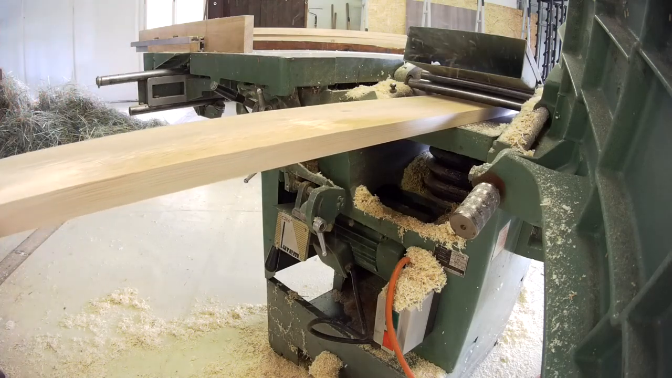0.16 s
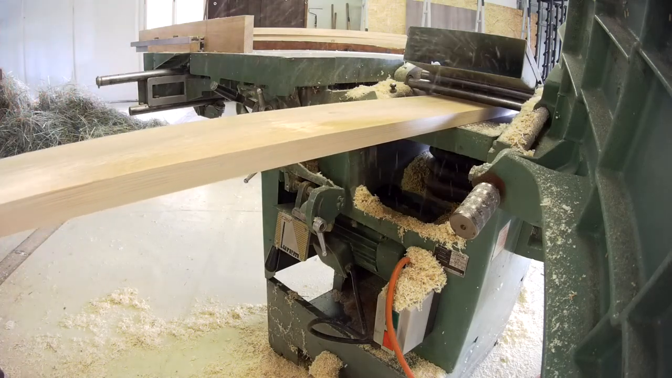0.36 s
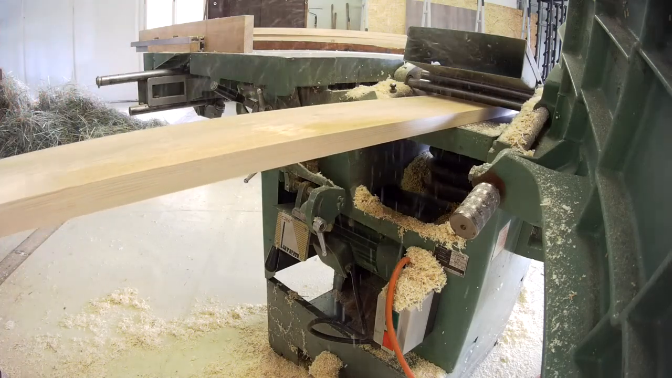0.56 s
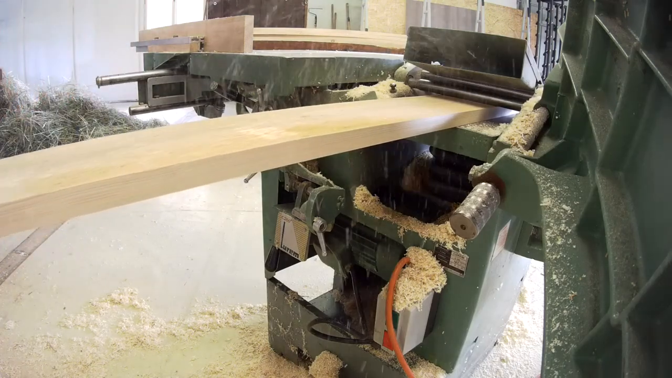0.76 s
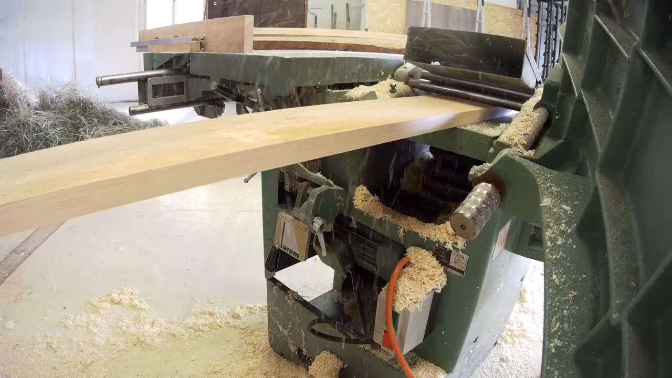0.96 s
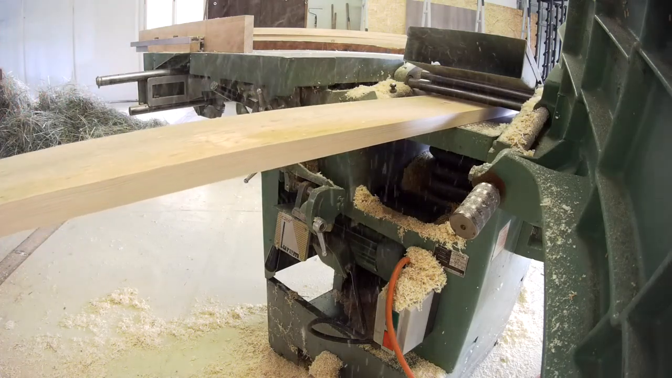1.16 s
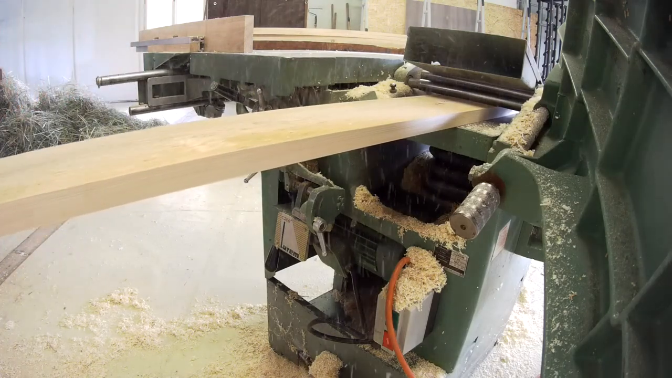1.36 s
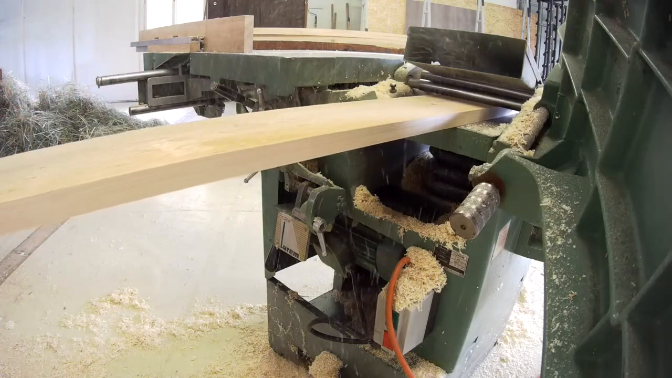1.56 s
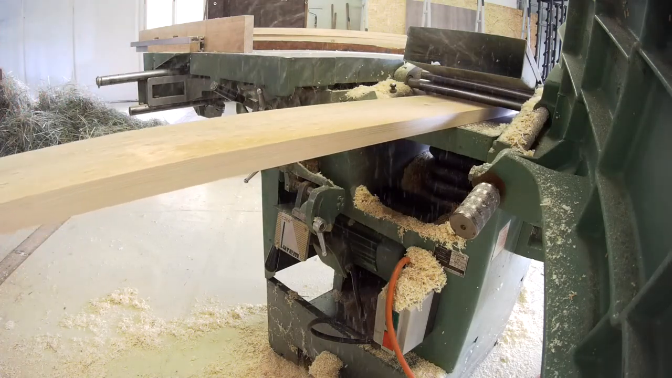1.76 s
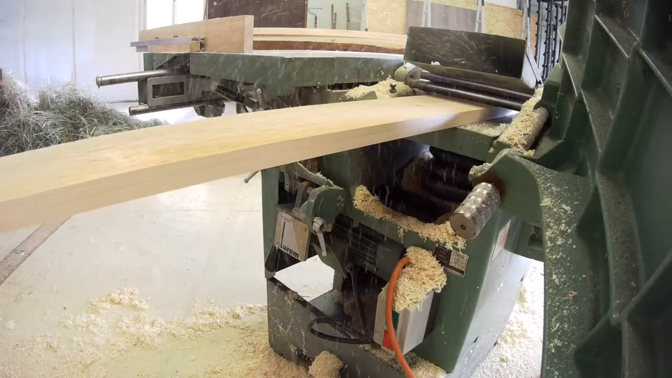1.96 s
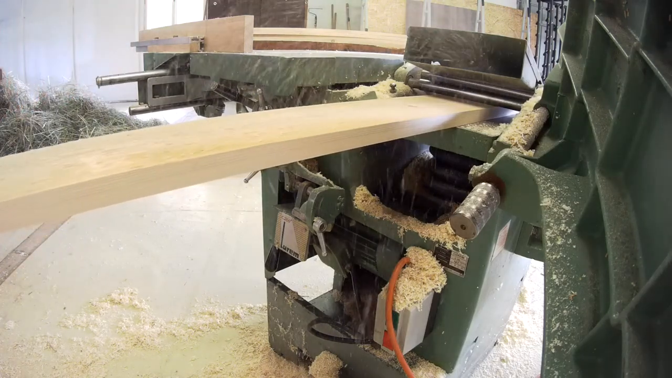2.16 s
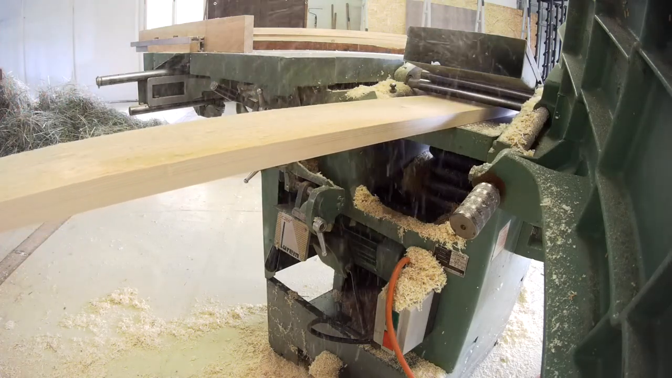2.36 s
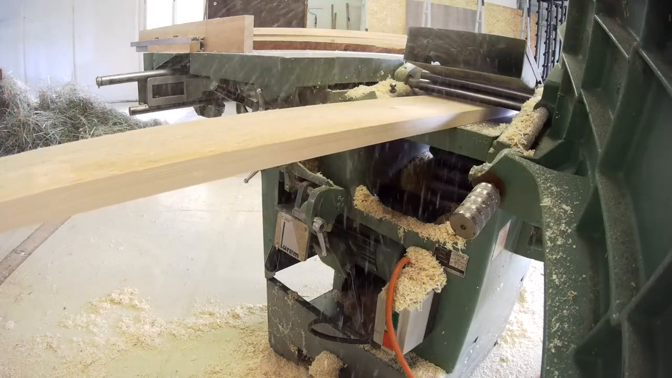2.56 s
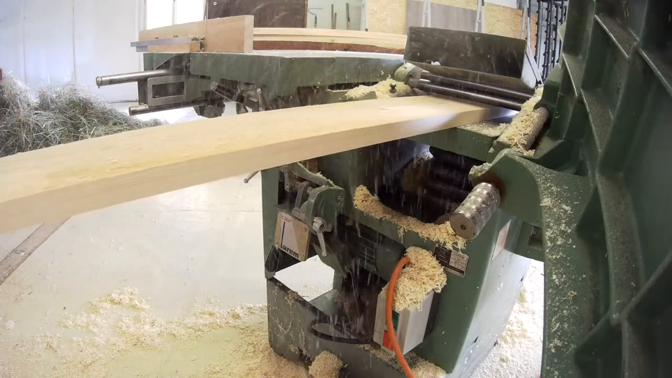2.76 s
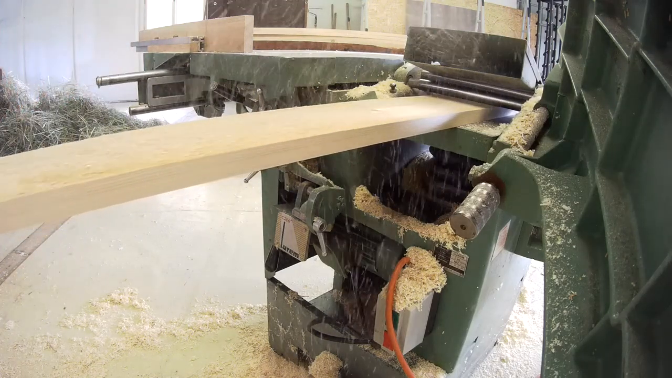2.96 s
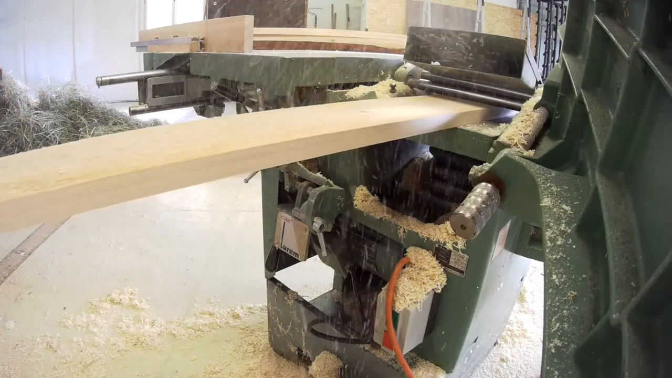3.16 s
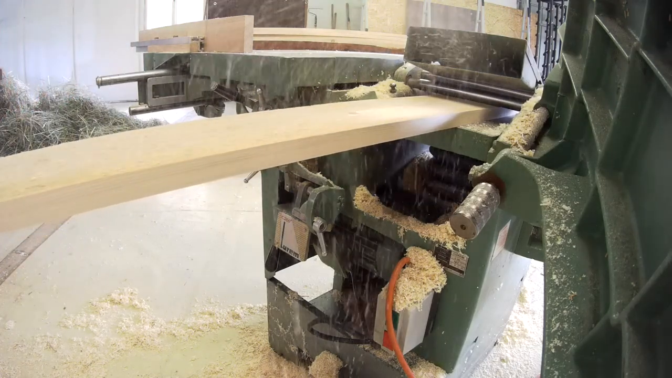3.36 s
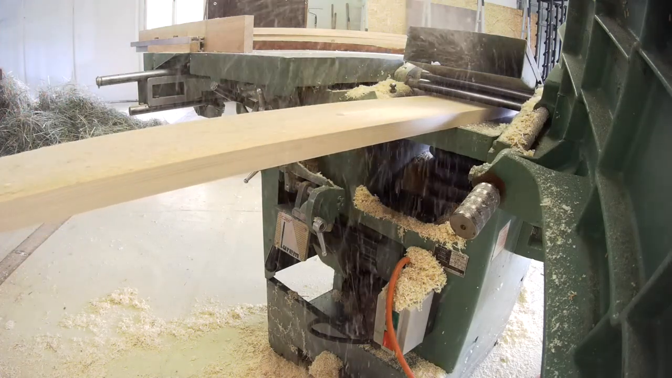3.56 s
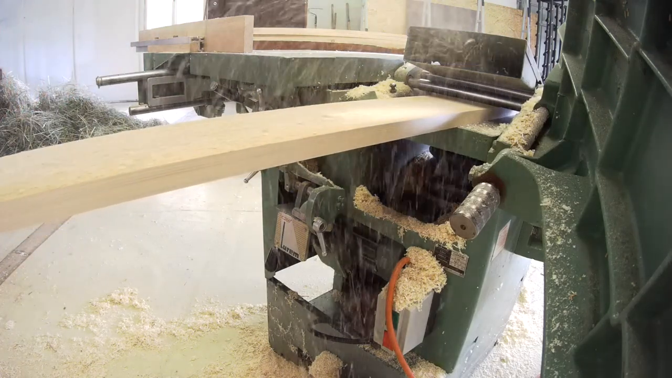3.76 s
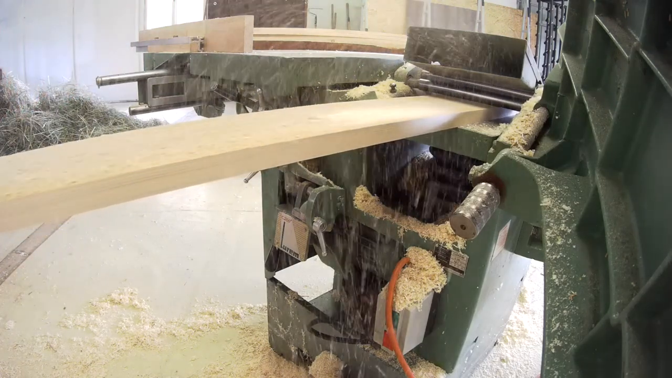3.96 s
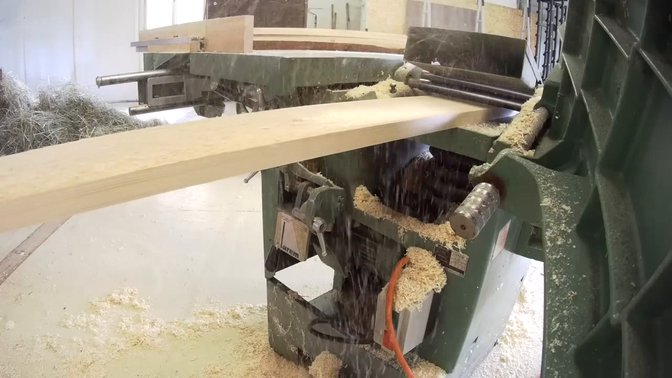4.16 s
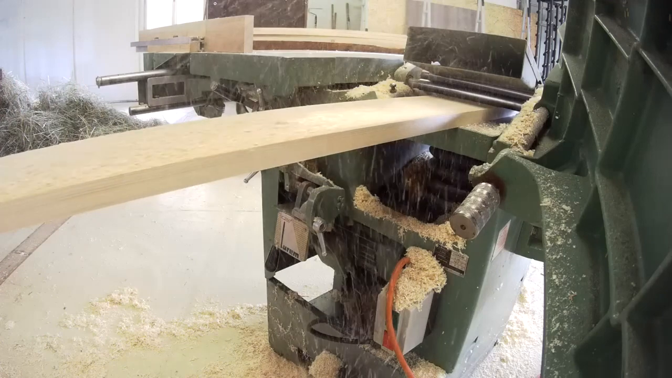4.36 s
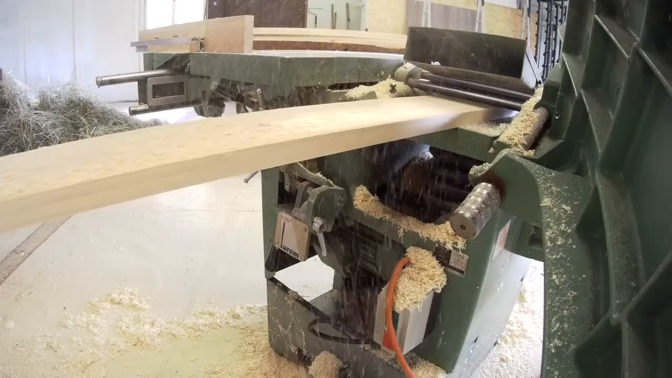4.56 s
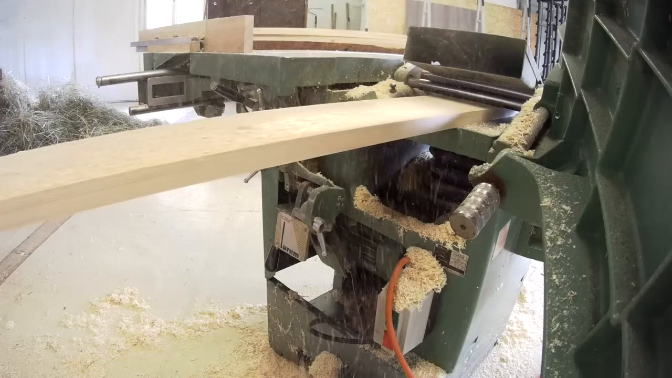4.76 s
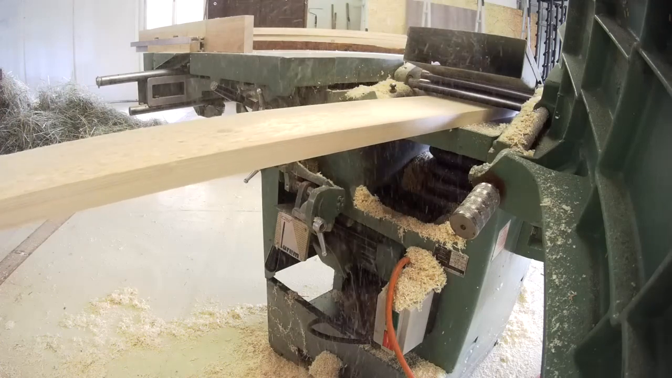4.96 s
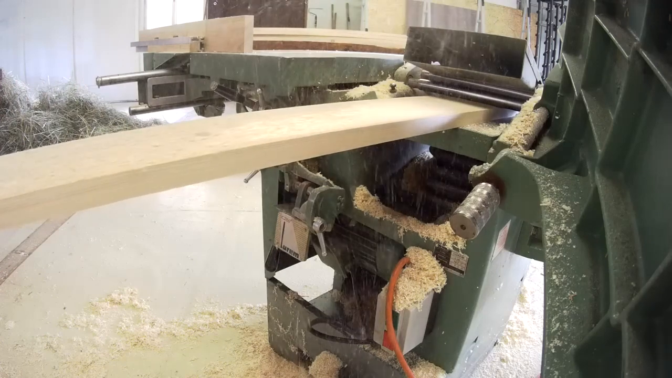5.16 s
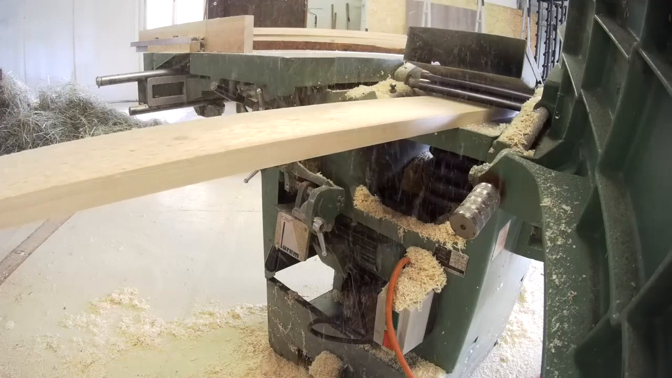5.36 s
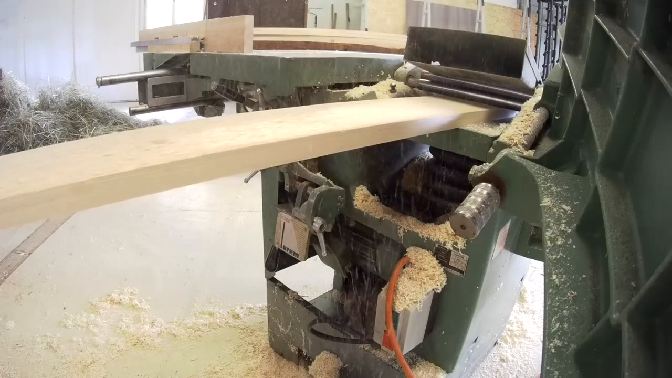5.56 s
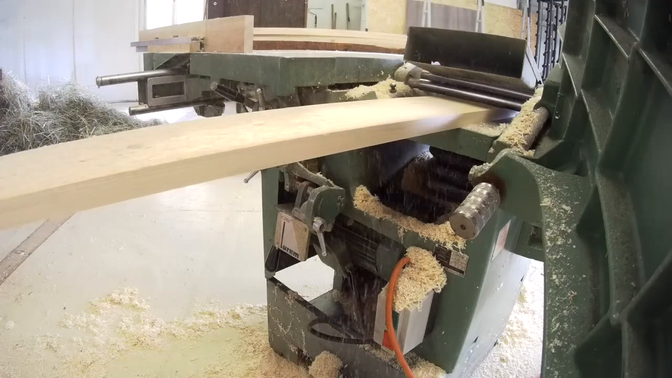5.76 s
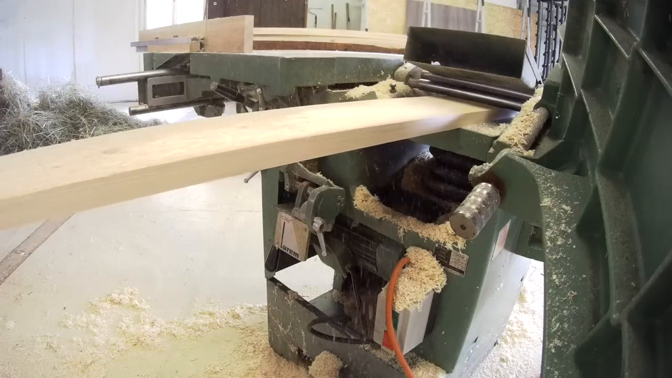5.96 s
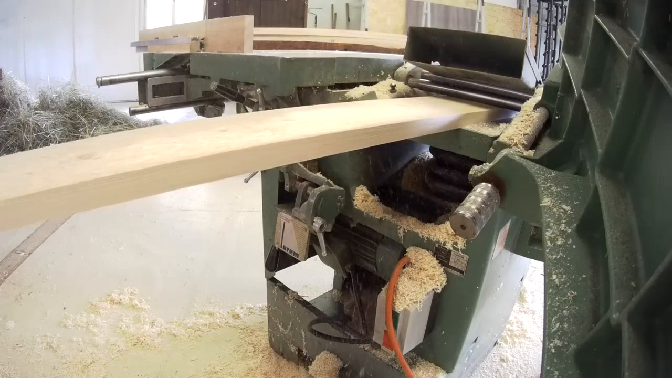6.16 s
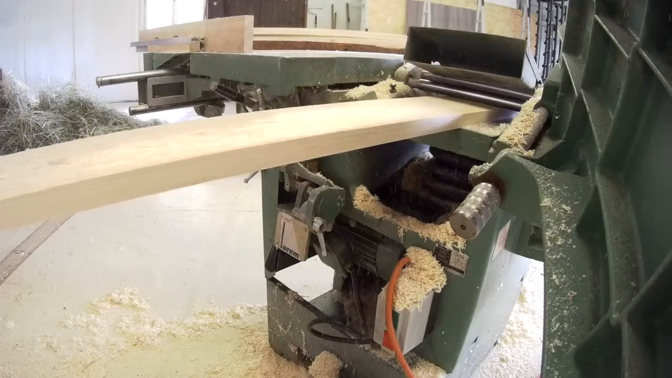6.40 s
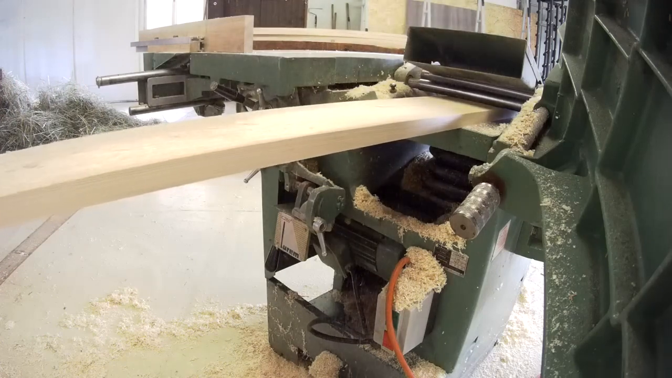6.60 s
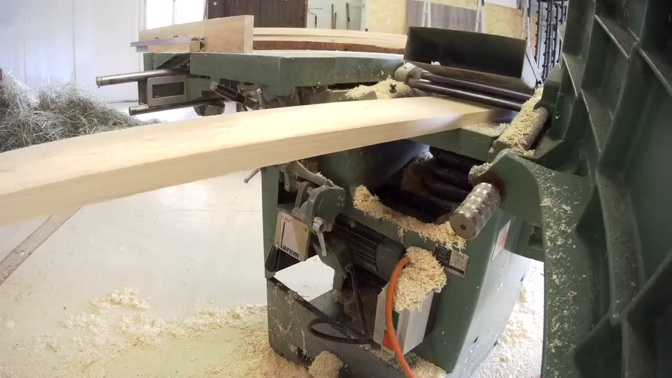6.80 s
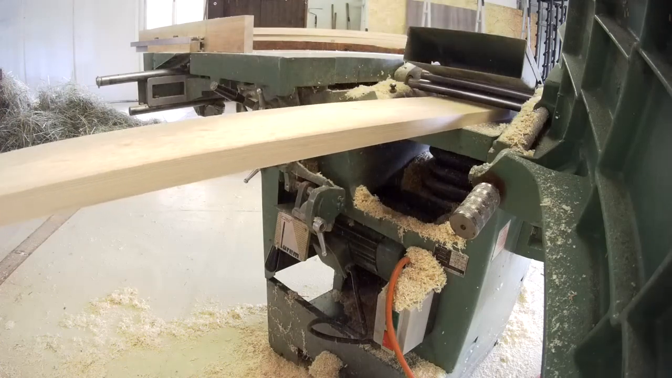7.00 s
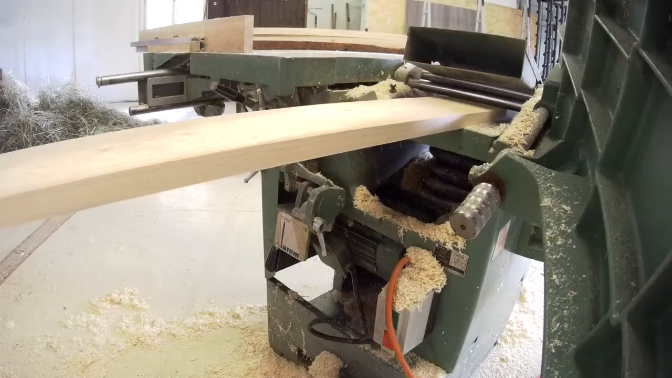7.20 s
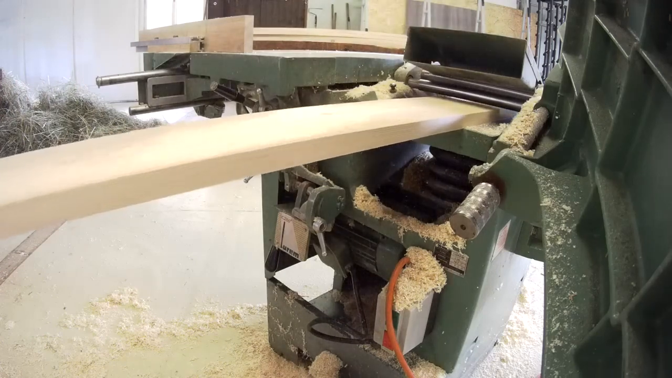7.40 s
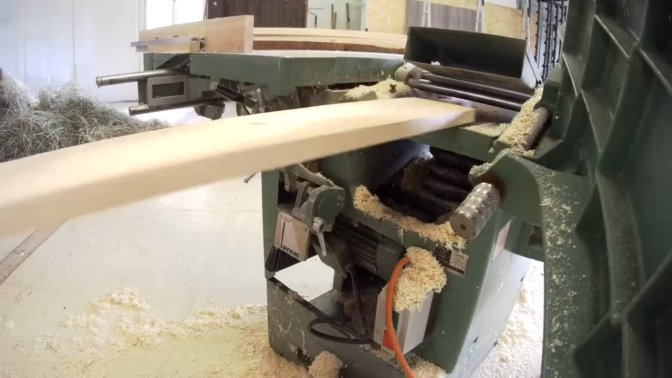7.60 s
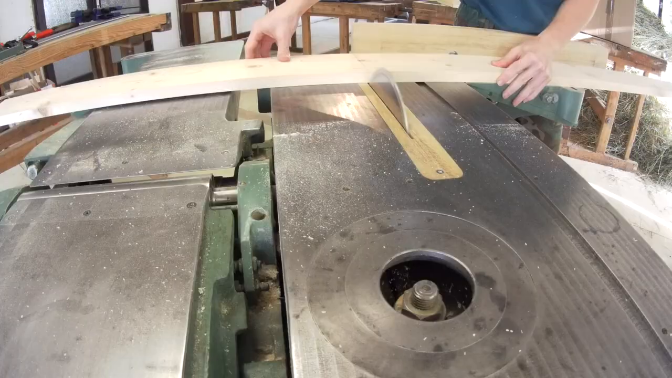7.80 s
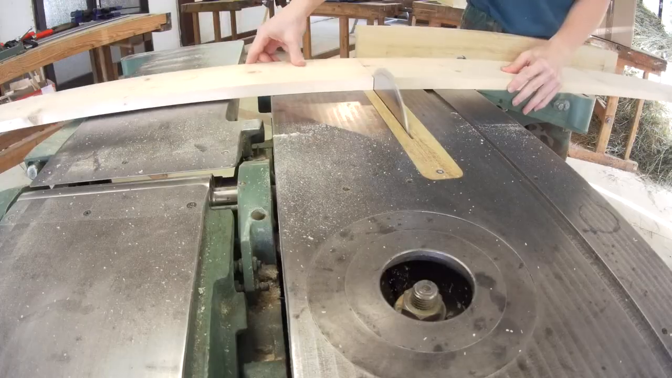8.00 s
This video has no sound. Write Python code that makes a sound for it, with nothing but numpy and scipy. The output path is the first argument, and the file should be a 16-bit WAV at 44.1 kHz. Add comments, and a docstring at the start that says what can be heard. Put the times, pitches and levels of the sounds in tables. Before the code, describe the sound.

Loud planer whine and machine rumble, with the rough rasp of wood being cut and chips spraying until the cut runs out.

```python
"""A loud whine and a woody rasp: a belt-driven thickness planer is already cutting a board.
Its three knives chop the air like a siren and strike the wood into resonance, labouring at a knot,
while chips patter on the hood until the cut runs out near 5.5 s. Beneath them the machine rumbles and
hums, a bearing sings and the belt throbs and chirps on every lap. The close microphone overloads,
and all stops dead at 7.83 s."""
import sys
import numpy as np
from scipy import signal
from scipy.fft import irfft
from scipy.io import wavfile

SR = 44100
rng = np.random.default_rng(int(sys.argv[2]) if len(sys.argv) > 2 else 0)


def bounce(signal):
    """Save signal as a 16-bit WAV file at the path given by the first command-line argument."""
    frames = np.transpose(np.atleast_2d(signal))
    limited = np.clip(frames, -1, 1)
    pcm = np.round(limited * 32767).astype(np.int16)
    wavfile.write(sys.argv[1], SR, pcm)


N = 354560
TIME = np.arange(N) / SR

# Likeness of left and right: f/Hz, correlation
COHERENCE = [(3500, 0.99), (5000, 0.12), (6500, 0.78), (8500, 0.36), (14000, .1)]
# Rotation of the cutter block, sagging under load: t/s, rate/Hz
BLOCK_SPEED = [(0.1, 115.19), (0.8, 115.12), (1.45, 115.27), (2, 114.95), (2.9, 114.93), (3.4, 114.76),
               (3.62, 114.45), (3.9, 115.02), (4.6, 115.28), (5.2, 115.22), (5.6, 115.58), (6.5, 115.69)]
# Windage and belt noise: f/Hz, relative spectral density/dB
RUMBLE_SPECTRUM = [(40, -4.5), (70, -40.5), (110, 2), (170, -1), (260, -1.5), (450, 2.5), (700, 3.5),
                   (1000, 4), (1400, 1.5), (2300, -8), (2700, -9.5), (6500, -9), (9500, -20),
                   (12300, -30.5), (14000, -70)]
# Drone of the unbalanced block: harmonic of the turn rate, free level/dB, loaded level/dB
UNBALANCE_TONES = [(2, -54, -54), (4, -46.5, -51), (5, -49, -47), (7, -45.5, -42), (8, -45, -48),
                   (10, -70.5, -47), (11, -79.5, -51.5), (13, -55.5, -49.5), (14, -57, -50),
                   (16, -72, -53.5), (17, -56, -46.5)]
# Motor and fan: f/Hz at idle, level/dB
MOTOR_TONES = [(48.7, -59.5), (487, -55.5), (1342, -50.5), (1980, -50.5)]
# The frame's once-a-turn hum: t/s, relative level/dB
FRAME_HUM = [(0.0, -54.5), (1.65, -53), (2.32, -51.5), (2.41, -67), (3.06, -61), (4.02, -60.5),
             (4.11, -48.5), (5.15, -69), (6.08, -48), (7.8, -51.5)]
# Resonances of the casting: f/Hz, bandwidth/Hz, level/dB
CASTING_MODES = [(976, 108, -41), (1033.7, 44, -39), (2156, 320, -46), (3015, 70, -53.5), (4150, 510, -49),
                 (5230, 390, -50), (6380, 550, -54), (7820, 370, -56)]
# Worn spots on the belt: position/laps, half length/laps, f/Hz, level/dB
WORN_SPOTS = [(0.03, 0.12, 2040, -43.5), (0.13, 0.058, 3030, -49), (0.84, 0.05, 2080, -48.5),
              (1, 0.23, 2900, -51.5), (1, 0.074, 4400, -53), (0.95, 0.16, 4000, -51.5),
              (0.4, 0.035, 3500, -55), (0.1, 0.084, 6000, -62), (0.9, 0.079, 4100, -64),
              (.14, .1, 18000, -61), (0.4, 0.14, 8300, -62), (0.62, 0.24, 9060, -52.5)]
# The board knocks on the table just before the knot: t/s, level/dB
TABLE_KNOCKS = [(3.274, -28), (3.295, -29), (3.325, -34)]
# Torn fibres and flying chips: f/Hz, relative spectral density/dB
CHIP_SPECTRUM = [(30, -14), (70, 0.5), (200, -14.5), (500, -16), (1000, -1.5), (1600, 5), (2800, -8.5),
                 (4200, 9), (5200, 7.5), (6500, 2), (8000, -2), (10500, -15), (12500, -10), (14500, -20)]
# Spurts in the treble of the spray: t/s, half length/s, gain/dB
CHIP_SPURTS = [(.35, 0.027, 1), (1.89, 0.027, 4.5), (2.65, 0.027, 0.5), (3.08, .03, 3), (3.66, 0.022, 0.5),
               (4.92, .14, 3), (5.3, .09, -1)]
# Response of board and hood, per overtone: f/Hz, first level/dB, last level/dB, knife-to-knife drop/dB
BOARD_RESPONSE = [(2070, -48.5, -49.5, 7.5), (2400, -50, -46, 6), (2780, -50.5, -57.5, 4),
                  (3120, -50, -49, 4), (3420, -48.5, -51, 2.5), (3830, -48, -45, 7.5),
                  (4250, -46.5, -45, 6), (4570, -48, -54, 3), (4700, -54, -55.5, 12), (5230, -54, -55, 9.5),
                  (5770, -62.5, -61, 5), (6600, -57.5, -62.5, 8), (7750, -67, -68.5, 12.5)]
# The grain excites one resonance of the board after another: t/s, half length/s, f/Hz, level/dB
GRAIN_SQUEALS = [(.25, 0.51, 3500, -47.5), (0.304, 0.58, 4170, -42), (0.282, .18, 5230, -45.5),
                 (.3, .18, 5820, -47.5), (0.686, 0.33, 2400, -39.5), (0.783, .17, 5100, -44.5),
                 (.9, 0.19, 3800, -41.5), (.97, 0.17, 5800, -50), (1.01, .2, 2230, -37),
                 (1.05, .25, 4050, -39.5), (1.12, .15, 6900, -54.5), (1.28, .17, 4470, -43),
                 (1.352, 0.39, 5540, -48.5), (1.55, .3, 3480, -49), (1.7, 1, 2370, -40.5),
                 (1.75, .18, 5800, -52), (1.98, 0.2, 5450, -45), (2.03, 0.26, 6600, -48),
                 (2.08, 0.46, 4250, -42.5), (2.37, .15, 4950, -42.5), (2.466, 0.19, 3930, -37.5),
                 (2.577, 0.1, 6410, -47.5), (2.887, 0.16, 2080, -42), (3.264, .2, 6750, -48),
                 (3.3, .36, 3950, -38.5), (3.6, .13, 6940, -50.5), (3.8, .25, 4400, -48.5),
                 (3.753, 0.095, 2220, -38), (3.9, 0.43, 5470, -50.5), (3.976, 0.69, 4020, -40.5),
                 (4.145, 0.18, 6230, -55.5), (4.8, 0.28, 3820, -45), (4.8, 0.35, 4180, -40.5),
                 (5.0, 0.34, 5300, -47.5), (5.3, .25, 5640, -45), (5.35, .2, 6200, -51)]
# Air chopped at the table lips: harmonic of the knife rate, level/dB with the slot covered, level/dB
# with it open, gain per sag/(dB/Hz), gain/dB from the pressing board, from the knot, from the tail
SIREN_HARMONICS = [(1, -36, -35.5, 3, -4, -0.5, 1), (2, -29, -34, -8, -2.5, 6, -14.5),
                   (3, -37.5, -30.5, 10, 1.5, -1, 0), (4, -28, -48.5, 2.3, -0.5, -9.5, 5.5),
                   (5, -36.5, -50, -5.5, -1, 10.5, -14.5), (6, -44, -57, -5, 3.5, 0, 4.5)]
# Swells and dips in the whine: t/s, half length/s, harmonic, gain/dB
SIREN_SWELLS = [(0.504, 0.38, 4, 2), (0.905, .15, 5, -12.5), (1.1, 0.63, 1, 1.5), (1.4, .2, 5, 3.5),
                (2.7, 0.23, 5, -4.5), (3.5, .06, 5, -5.5), (3.732, 0.023, 5, -12), (4.8, .6, 1, 2.5),
                (4.898, 0.52, 5, 4), (6.5, 0.41, 2, 6)]

KNIVES, IDLE_HZ = 3, 115.69
CUT_ENDS_S, STOP_S = 5.72, 7.833


def from_db(db):
    """Amplitude ratio of a level in decibels."""
    return 10 ** (np.asarray(db) / 20)


def rms_one(x):
    """Normalisation to unit rms."""
    return x / np.sqrt(np.mean(x ** 2) + 1e-20)


def in_time(curve):
    """Linear interpolation of a curve at every sample."""
    return np.interp(TIME, *np.transpose(curve))


def at_hz(spectrum, hz, column=1):
    """Interpolation on a logarithmic frequency axis."""
    rows = np.array(spectrum)
    return np.interp(np.log(hz), np.log(rows[:, 0]), rows[:, column])


def bell(offset, half_width):
    """Gaussian curve of height 1, down to 1/e at half_width."""
    return np.exp(-np.minimum((offset / half_width) ** 2, 20))


def ramp(start_s, rise_s):
    """Linear rise from 0 to 1."""
    return np.clip((TIME - start_s) / rise_s, 0, 1)


def plateau(start_s, rise_s, end_s, fall_s):
    """Trapezoidal envelope of height 1, back at 0 by end_s."""
    return np.minimum(ramp(start_s, rise_s), np.clip((end_s - TIME) / fall_s, 0, 1))


def drift(corner_hz):
    """Random fluctuation: low-passed noise of about unit rms."""
    hop, settle = 100, 2000
    pole = np.exp(-2 * np.pi * corner_hz * hop / SR)
    white = rng.standard_normal(N // hop + settle + 2)
    slow = signal.lfilter([1], [1, -2 * pole, pole * pole], white)[settle:]
    return np.interp(np.arange(N) / hop, np.arange(len(slow)), rms_one(slow))


def looped(laps, ripples):
    """Periodic noise: a random Fourier series of unit rms that repeats on every lap."""
    coefficients = rng.standard_normal((ripples, 2)) @ [1, 1j]
    profile = rms_one(irfft(np.append(0, coefficients), 16 * ripples))
    return np.interp(laps % 1, np.linspace(0, 1, len(profile) + 1), np.append(profile, profile[0]))


def band(x, low, high, order=2):
    """Butterworth band-pass filter."""
    sos = signal.butter(order, [low, min(high, .45 * SR)], "band", fs=SR, output="sos")
    return signal.sosfilt(sos, x + 1e-18)


def bands(low, high, count):
    """Bands of constant frequency ratio, as (low edge, centre, high edge)."""
    edges = np.geomspace(low, high, count + 1)
    return zip(edges, np.sqrt(edges[:-1] * edges[1:]), edges[1:])


def stereo(pair, hz):
    """Partial coherence: two independent noises mix to left and right, alike except in the treble."""
    alike = at_hz(COHERENCE, hz) if hz > COHERENCE[0][0] else 1
    return np.sqrt((1 + alike) / 2) * pair[0] + np.sqrt((1 - alike) / 2) * pair[1] * [[1], [-1]]


def narrow_noise(hz, width_hz):
    """A randomly driven resonance: narrow-band stereo noise of unit rms."""
    white = rng.standard_normal((2, N))
    return rms_one(stereo(band(white, hz - width_hz / 2, hz + width_hz / 2), hz))


def blend(noise, periodic, share):
    """Incoherent addition: the periodic part supplies the given share of the power."""
    return np.sqrt(1 - share) * noise + np.sqrt(share) * rms_one(periodic)


def rumble(laps, level_db=-38.5, throb_db=2.6):
    """Turbulence gives broadband windage; the belt's surface adds noise that repeats each lap."""
    white, out = rng.standard_normal((2, 2, N)), 0
    surface = looped(laps, ripples=220)
    for k, (low, hz, high) in enumerate(bands(35, 15000, count=20)):
        air = rms_one(stereo(band(white[k % 2], low, high), hz))
        if 100 < hz < 2500:
            air = blend(air, band(surface, low, high), share=0.15)
        density_db = at_hz(RUMBLE_SPECTRUM, hz) + throb_db * looped(laps, ripples=6)
        out = out + air * np.sqrt(high - low) * from_db(density_db)
    return from_db(level_db) * rms_one(out)


def hum(turns, in_wood, slip_rad=0.12):
    """Forced vibration: the tones of the unbalanced block and the motor sag together with the speed."""
    tones = [(round(k) * turns, free_db + in_wood * (loaded_db - free_db))
             for k, free_db, loaded_db in UNBALANCE_TONES]
    tones += [(hz * turns / IDLE_HZ, db) for hz, db in MOTOR_TONES]
    drone = sum(from_db(db) * np.sin(2 * np.pi * cycles + slip_rad * drift(2.8)) for cycles, db in tones)
    frame = from_db(in_time(FRAME_HUM) - 3) * np.sin(2 * np.pi * turns)
    return np.sqrt(2) * (drone + frame)


def casting(laps, in_wood, rattle_db=2.0, taut_belt_db=-3):
    """Resonance: belt and bearings rub the casting's modes in bursts; a taut belt rubs less treble."""
    out, surface = 0, looped(laps, ripples=220)
    for hz, width, level_db in CASTING_MODES:
        ring = narrow_noise(hz, width)
        if hz < 2500:
            ring = blend(ring, band(surface, hz - width / 2, hz + width / 2), share=0.79)
        else:
            level_db = level_db + taut_belt_db * in_wood
        bursts = from_db(rattle_db * looped(laps, ripples=5))
        out = out + from_db(level_db) * rms_one(ring * bursts)
    return out


def bearing(laps, in_wood, free_db=-56, taut_belt_db=-10, chatter_db=3.5):
    """Amplitude modulation: a thin squeal chatters with each lap, louder once the belt slackens."""
    ring = narrow_noise(hz=9140, width_hz=200)
    chatter = from_db(chatter_db * looped(laps, ripples=5))
    return from_db(free_db + taut_belt_db * in_wood) * rms_one(ring * chatter)


def belt_chirps(laps, in_wood, uneven_db=2.5, taut_belt_db=-6.5):
    """Friction: each worn spot squeaks as it passes over a pulley, less when the belt is taut."""
    out = 0
    for place, half_length, hz, level_db in WORN_SPOTS:
        distance = (laps - place + .5) % 1 - .5
        out = out + from_db(level_db) * bell(distance, half_length) * narrow_noise(hz, width_hz=130)
    return out * from_db(uneven_db * drift(3.8) + taut_belt_db * in_wood)


def knocks(t60_s=0.057):
    """Damped impacts: wood on iron gives dull bursts of noise that decay exponentially."""
    envelope = sum(from_db(db - 60 * np.clip(TIME - s, 0, 1) / t60_s) * (TIME >= s)
                   for s, db in TABLE_KNOCKS)
    return envelope * rms_one(band(rng.standard_normal(N), 553, 1900))


def sizzle(middle_s=5.33, half_s=.13, level_db=-55):
    """Narrow-band cutting noise: a high hiss as the knives shave the very end of the board."""
    return from_db(level_db) * bell(TIME - middle_s, half_s) * narrow_noise(hz=11600, width_hz=640)


def chips(turns, sag_hz, level_db=-44, db_per_sag_hz=7.5, grain_db=3.0, crackle_db=1.6):
    """Random impacts: each knife throws a puff of chips at the hood, and the spray grows with load."""
    # The first knife throws the most.
    puffs = 1 + 0.2 * np.cos(2 * np.pi * KNIVES * turns) + 0.11 * np.cos(2 * np.pi * turns)
    grains = rng.standard_normal((2, 2, N)) * puffs
    grains *= from_db(grain_db * np.minimum(rng.exponential(1, N), 6))
    spurt_db = sum(db * bell(TIME - s, half_s) for s, half_s, db in CHIP_SPURTS)
    spurts = from_db(spurt_db + crackle_db * drift(120))
    spray = 0
    for k, (low, hz, high) in enumerate(bands(25, 15000, count=16)):
        flicker = from_db(drift(14)) * (spurts if hz > 7000 else 1)
        patter = stereo(band(grains[k % 2], low, high), hz)
        spray = spray + patter * from_db(at_hz(CHIP_SPECTRUM, hz)) * flicker
    return rms_one(spray) * from_db(level_db + db_per_sag_hz * sag_hz + .6 * drift(15))


def rasp(turns, spread_rad=0.67, wander_db=1.53, jitter_turns=.0002, squeal_width_hz=193):
    """Source and filter: periodic knife blows make overtones, lifted where the board resonates."""
    fed = np.minimum(TIME / CUT_ENDS_S, 1)
    uneven = 0.85 + 0.3 * fed   # the knives' uneven setting tells more as the cut goes on
    squeal_power = np.array([(from_db(db) * bell(TIME - s, half_s)) ** 2
                             for s, half_s, _, db in GRAIN_SQUEALS])
    squeal_hz = np.array(GRAIN_SQUEALS)[:, 2]
    angle = 2 * np.pi * (turns + jitter_turns * drift(50))
    lag, buzz = 0, 0
    for k in range(18, 70):
        hz = k * IDLE_HZ
        first_db, last_db, drop_db = [at_hz(BOARD_RESPONSE, hz, column) for column in (1, 2, 3)]
        ringing = from_db(first_db + fed * (last_db - first_db)) ** 2
        squealing = bell(hz - squeal_hz, squeal_width_hz) @ squeal_power
        # Each knife comes a third of a turn later and softer than the one before.
        softer = from_db(-drop_db * uneven)
        next_knife = softer * np.exp(-2j * np.pi * k / KNIVES)
        blows = (1 + next_knife + next_knife ** 2) / np.sqrt(1 + softer ** 2 + softer ** 4)
        lag = lag + spread_rad * drift(.5)   # ringing and echoes spread each blow into a short burst
        amplitude = np.sqrt(ringing + squealing) * from_db(wander_db * drift(2.0))
        buzz = buzz + amplitude * np.real(blows * np.exp(1j * (k * angle + lag)))
    release_db = -31.5 * np.maximum(TIME - 5.22, 0)   # the rollers let go of the tail
    return np.sqrt(2) * buzz * from_db(release_db + 0.8 * drift(70))


def whine(turns, laps, sag_hz, throb=0.24, flutter=0.097, waver_db=0.64, wander_db=0.5):
    """Siren principle: the knives chop the air at the table lips; load and board colour the tone."""
    belt_tug = np.cos(2 * np.pi * (laps - .58)) + .55 * np.cos(6 * np.pi * (laps - .36))
    pressed = plateau(start_s=2.15, rise_s=0.37, end_s=3.5, fall_s=0.11)   # bowed board on the lips
    knot = bell(TIME - 3.61, 0.12)
    uncovered = ramp(start_s=5.42, rise_s=1.24)   # the slot around the block opens
    tail = plateau(start_s=5.26, rise_s=1, end_s=7.0, fall_s=0.11)   # slides over the far lip, drops
    drawn_away = ramp(start_s=7.33, rise_s=0.18)
    out = 0
    for harmonic, covered_db, open_db, sag_slope, press_db, knot_db, tail_db in SIREN_HARMONICS:
        k = round(harmonic)
        level_db = covered_db + uncovered * (open_db - covered_db) + sag_hz * sag_slope
        level_db += pressed * press_db + knot * knot_db + tail * tail_db
        level_db += sum(db * bell(TIME - s, half_s) for s, half_s, n, db in SIREN_SWELLS if n == k)
        depth = flutter
        if k == 3:   # this harmonic throbs most, and eases as the board is drawn away
            depth = throb
            level_db -= 7 * drawn_away
        tone = np.sin(2 * np.pi * (k * KNIVES * turns + rng.random()))
        level_db += waver_db * drift(24.0) + wander_db * drift(2.5)
        out = out + from_db(level_db) * rms_one((1 + depth * belt_tug) * tone)
    return out


def scene():
    """Superposition: machine and cut follow the block's rotation, whose sag tells the load."""
    speed_hz = in_time(BLOCK_SPEED)
    sag_hz = IDLE_HZ - speed_hz
    in_wood = np.clip((CUT_ENDS_S - TIME) / .25, 0, 1)
    turns = np.cumsum(speed_hz) / SR
    turns_per_lap = 9.142 - 0.042 * in_wood
    laps = np.cumsum(speed_hz / turns_per_lap) / SR - .32   # of the belt
    cut = rasp(turns) + sizzle() + chips(turns, sag_hz)
    machine = belt_chirps(laps, in_wood) + whine(turns, laps, sag_hz) + hum(turns, in_wood)
    machine = machine + rumble(laps) + casting(laps, in_wood) + bearing(laps, in_wood)
    return machine + in_wood * cut + knocks()


def record(dry, ceiling=.106, mono_below_hz=6820, cutoff_hz=14000):
    """Saturation flattens the peaks; the sound is then made mono below the treble, gated, low-passed."""
    excess = dry - dry / (1 + (dry / ceiling) ** 12) ** (1 / 12)
    rounding = signal.butter(2, 6500, fs=SR, output="sos")   # rounds the corners of the flat tops
    left, right = dry - signal.sosfiltfilt(rounding, excess)
    side = band((left - right) / 2, mono_below_hz, 16000, order=6)
    folded = (left + right) / 2 + side * [[1], [-1]]
    gate = np.clip((STOP_S - TIME) / .003, 0, 1)
    return signal.sosfilt(signal.ellip(10, .1, 90, cutoff_hz, fs=SR, output="sos"), folded * gate)


dry = scene()
out = record(dry)
bounce(out)
```